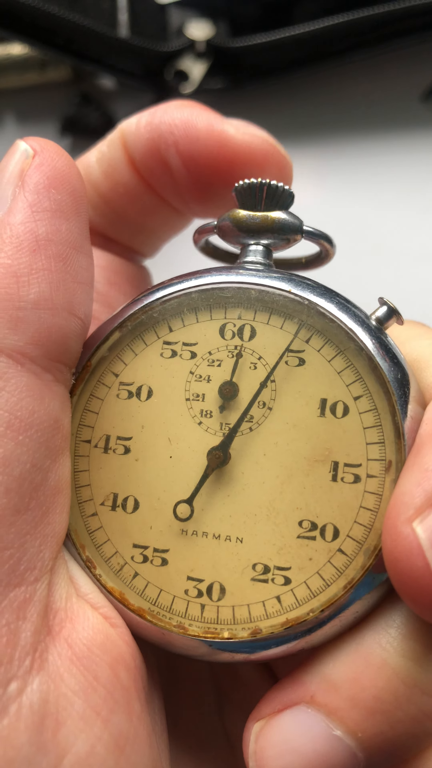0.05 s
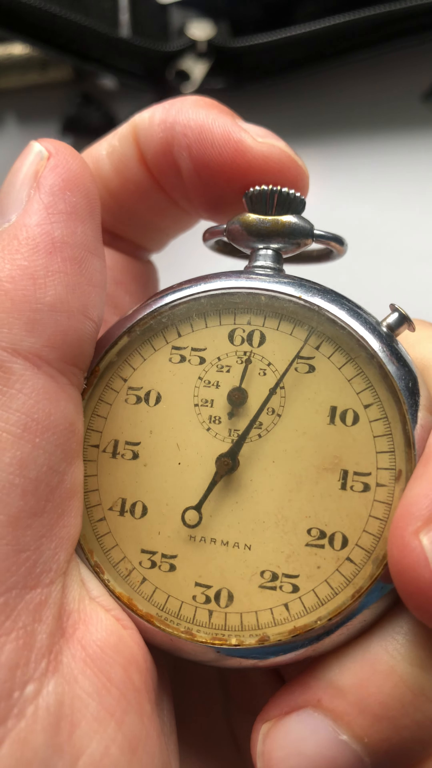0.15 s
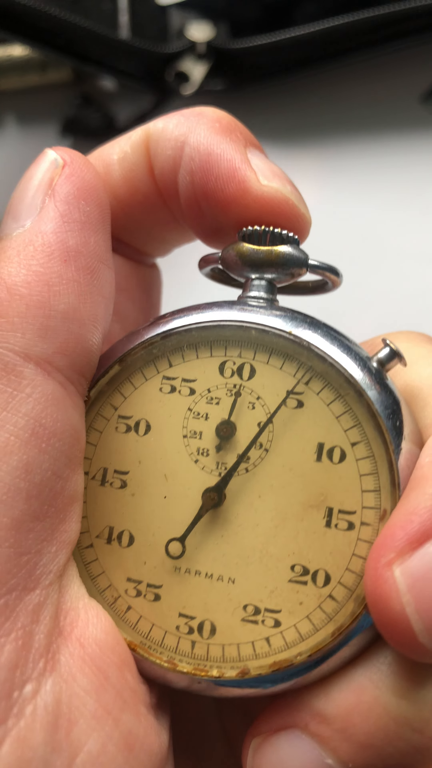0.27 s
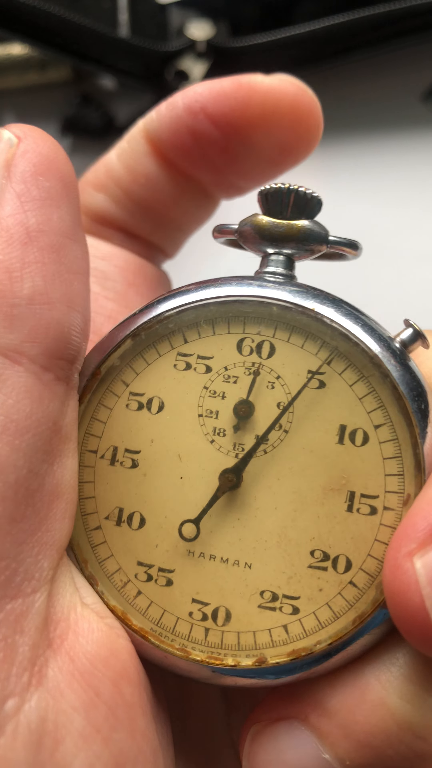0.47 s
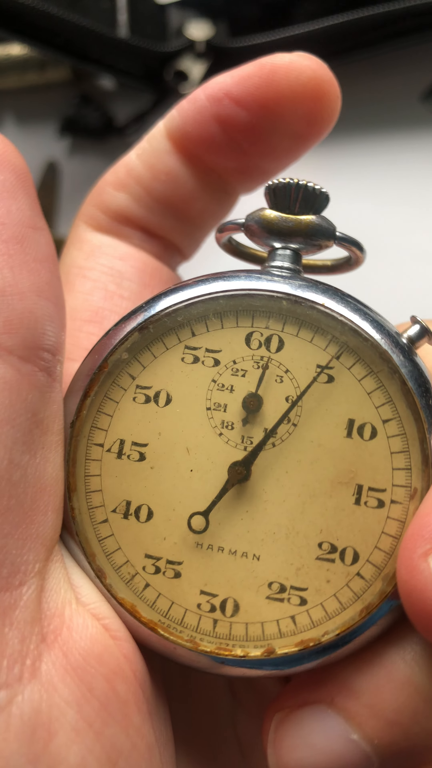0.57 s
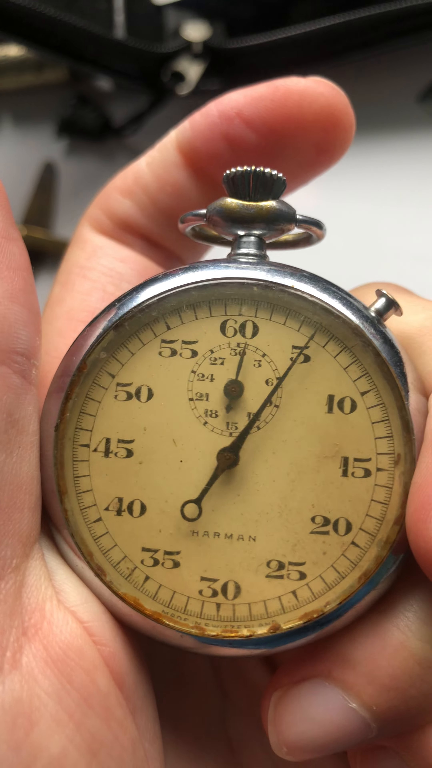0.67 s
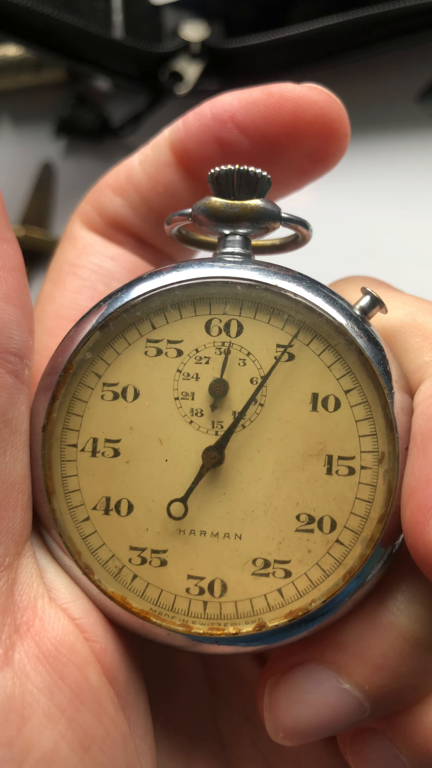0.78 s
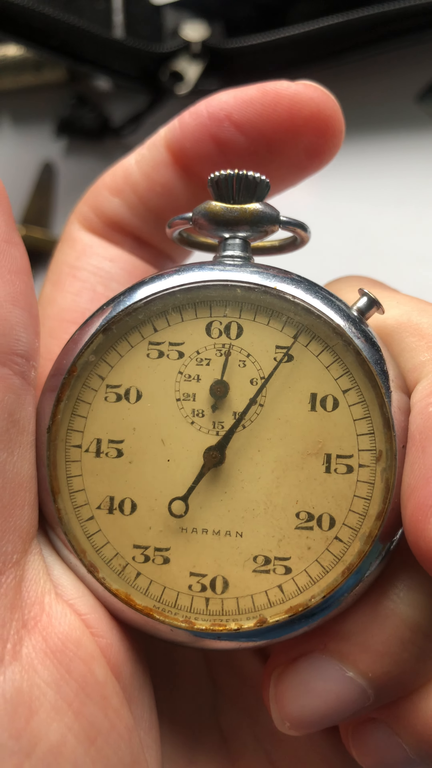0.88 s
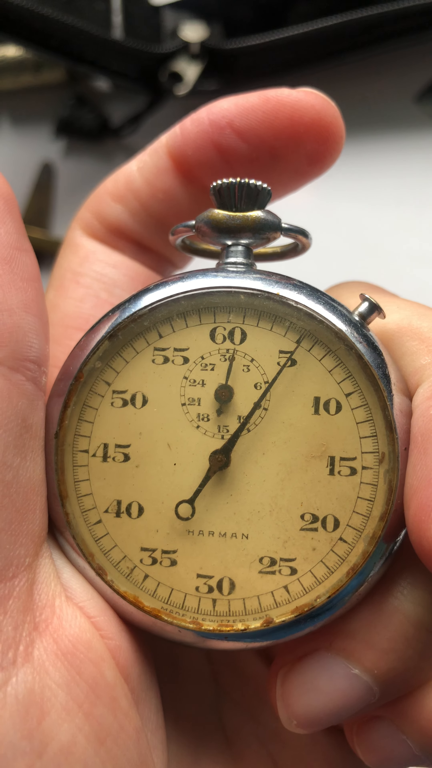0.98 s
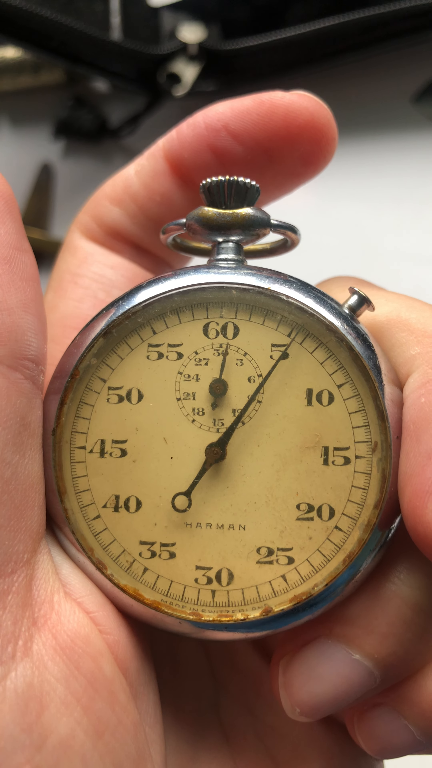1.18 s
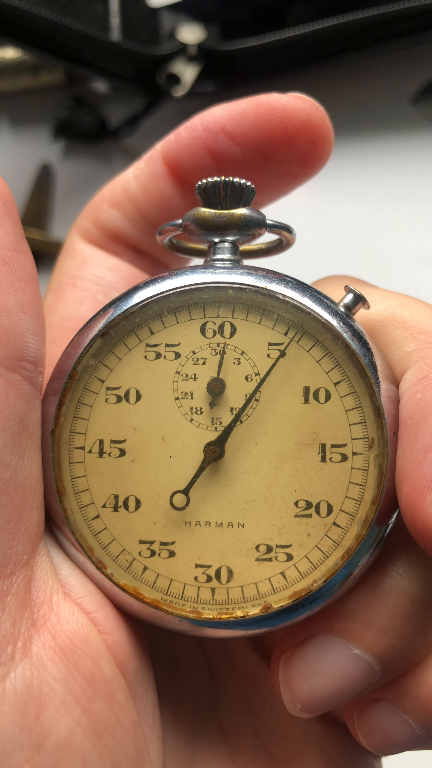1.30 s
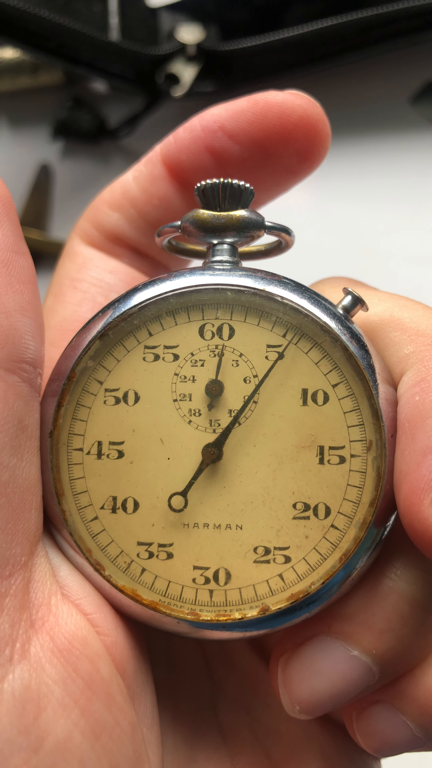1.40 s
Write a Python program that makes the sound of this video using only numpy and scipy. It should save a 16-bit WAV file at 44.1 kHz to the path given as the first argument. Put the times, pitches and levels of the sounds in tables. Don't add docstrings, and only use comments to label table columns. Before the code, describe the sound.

Close-up mechanical stopwatch in a quiet room: faint crown knocks, a firm press click and loud bright snap, a lighter spring-back click, then soft ticking about five times a second, over faint room air.

```python
import sys
import numpy as np
from scipy import signal
from scipy.fft import rfft, irfft
from scipy.io import wavfile
from scipy.ndimage import uniform_filter1d

SR = 44100
rng = np.random.default_rng(int(sys.argv[2]) if len(sys.argv) > 2 else 0)


def to_wav(sig):
    pcm = np.clip(np.atleast_2d(sig), -1, 1) * 32767
    pcm = np.round(pcm).astype(np.int16)
    wavfile.write(sys.argv[1], SR, pcm.T)


def volts_from_decibels(level):
    exponent = np.asarray(level, float) / 20
    return 10 ** exponent


N = 63945

# (frequency [Hz], level [dB per Hz])
AIR_COLOUR = [(15, -36), (25, -5), (200, -2), (1290, -17), (1610, -17.5), (2000, -19), (2690, -21.5),
              (3720, -22), (16000, -31.5)]
# (frequency [Hz], width [Hz], level [dB])
MACHINERY = [(194, 13, -76), (133, 20, -86.5)]
# (frequency [Hz], level [dB])
WALL_COLOUR = [(500, -20.5), (1200, -2.5), (2200, 2.5), (6000, -3), (16000, -11.5)]
# (time [s], frequency [Hz], level [dB], t60 [s], damped after [s])
SINGING_SPRINGS = [
    (0.265, 1069, -68.5, .9, 0.38),
    (.266, 1905, -45.5, .2, 0.12),
    (0.267, 3790, -61.5, .2, 0.12),
    (.266, 5500, -60, .15, 0.047),
    (.531, 5550, -64.5, .4, 0.078),
]
# (frequency [Hz], level [dB])
SMALL_PARTS_COLOUR = [(700, -31.5), (1400, -16.5), (2500, 0), (6000, -2), (11000, -1), (16000, 2)]
# (time [s], level [dB], chatter [s], brightness [dB per octave])
FINGER_TOUCHES = [(.0119, -53, 0.0019, -5.5), (.0172, -45.5, 0.0028, -2.5), (.0215, -48, 0.0032, 2),
                  (.0275, -66, 0.0027, 0), (.0345, -64.5, 0.0067, -11), (.108, -66.5, .03, -2),
                  (.15, -66, 0.032, 4), (.209, -62.5, 0.0053, 1.5), (.4557, -59, 0.00072, -7),
                  (.4838, -45.5, 0.0018, 3), (.5152, -40, .0018, -1)]
# (time [s], level [dB], chatter [s], brightness [dB per octave])
CROWN_PRESS = [
    (.2275, -49, .0012, 4),
    (.2392, -29, 0.0013, 2.5),
    (.2445, -40.5, 0.00078, -2),
]
# (time [s], level [dB], chatter [s], brightness [dB per octave])
LEVER_SNAP = [
    (.2637, -31.5, 0.00043, 4),
    (.2656, -12.5, 0.00093, 1.5),
    (.2685, -25, .0005, -1),
    (.2935, -56, .002, -1.5),
    (.3222, -62.5, 0.0018, 9),
]
# (time [s], level [dB], chatter [s], brightness [dB per octave])
CROWN_RELEASE = [
    (.478, -60, .006, 1),
    (.493, -50, 0.00063, 1),
    (.495, -27.5, 0.001, 3.5),
    (.5025, -48, .002, -2),
]
# (time [s], level [dB], chatter [s], brightness [dB per octave])
ESCAPEMENT_TICKS = [(.7025, -70, .002, 1), (.7138, -63.5, 0.0029, 1.4), (.7322, -55.5, 0.0035, -0.57),
                    (.8944, -67, 0.0025, 2.8), (.9085, -62.5, 0.0037, 1.2), (.9245, -58, .003, 0.32),
                    (1.103, -74.5, 0.0033, 2), (1.1165, -60, 0.0031, 0), (1.1333, -56, 0.0025, -0.44),
                    (1.2915, -67.5, 0.0015, 3), (1.3119, -64, .003, 0.77), (1.3274, -57.5, 0.0017, 1.25)]
# (frequency [Hz], level [dB], t60 [s])
TOUCH_CASE_MODES = [(1790, -10, .015), (2030, 1, .025), (2340, -4, .025), (2910, -4.5, 0.017),
                    (3100, -8, 0.03), (3770, -8.5, .02), (4700, -13, .015), (5500, -10.5, 0.036),
                    (8600, -28.5, 0.025)]
PRESS_CASE_MODES = [(1240, -20.5, .014), (1900, -3, .015), (2380, -5.5, .022), (2937, 1.5, .02),
                    (3710, -15.5, 0.026), (4678, -9, .025), (5340, 2.5, .018), (5550, -1.5, .028),
                    (7337, -10.5, .01), (8400, -9, .01), (11000, -13.5, .01), (11770, -8.5, .008),
                    (13400, -16.5, .008), (15500, -9.5, .01)]
SNAP_CASE_MODES = [(850, -38.5, .012), (1460, -19, 0.0082), (1905, 1, 0.014), (2282, -5.5, 0.016),
                   (2980, -13.5, .02), (3790, -19, .035), (5050, -5, .012), (5500, -6.5, 0.015),
                   (8730, -2, 0.0058), (10100, -9, 0.0063), (11450, -10, 0.0057), (13330, -16, 0.016),
                   (14450, -10, 0.0053), (15460, -17.5, 0.0077)]
RELEASE_CASE_MODES = [(1226.5, -13, 0.048), (1757, 3, 0.012), (2030, -16.5, 0.075), (2430, -2.5, 0.038),
                      (2890, 4, 0.017), (3780, -9, 0.025), (4550, 6, 0.004), (5630, -15, 0.02),
                      (5840, -15.5, 0.031), (7770, -12.5, 0.024), (8500, -22, .008), (11870, -4, .006),
                      (12450, -35.5, .01), (15240, -22, .008)]
TICK_CASE_MODES = [(2355, -6, 0.013), (2790, -9.5, 0.062), (3023, -0.5, 0.016), (4724, -10.5, .07),
                   (5250, -1.5, 0.025), (5550, -2, 0.032), (6430, -4, 0.0083), (7245, -7.5, 0.013),
                   (8920, 1.5, 0.0057), (9890, -7.5, 0.018), (10430, -8, .035), (12700, -1, 0.0069),
                   (13300, -5, 0.005), (14500, -2, 0.012)]

AIR_DB, AIR_PATCHY_DB = -71, 3
WALLS_DB, WALLS_T60_S = -34.5, 0.34
NEAR_DB, NEAR_T60_S = -21.5, 0.027
MODAL_ECHO_DB = -5.5
GATE_S, GATE_FALL_S = 0.06, 0.05
CHATTER_PER_S, CHATTER_SPREAD_DB = 9000, 4.0
MODE_SPREAD_DB = 2.0
SMALL_PARTS_T60_S = 0.014
BODY_LOW_HZ = 700


def rms_one(x):
    return x / np.sqrt(np.mean(x ** 2) + 1e-20)


def colour(x, points):
    hz, db = np.transpose(points)
    f = np.maximum(np.arange(len(x) // 2 + 1) * SR / len(x), 1)
    gain = volts_from_decibels(np.interp(np.log(f), np.log(hz), db))
    return irfft(rfft(x) * gain, len(x))


def ring(clicks, hz, t60):
    radius = volts_from_decibels(-60 / (t60 * SR))
    angle = 2 * np.pi * hz / SR
    return signal.lfilter([0, np.sin(angle)], [1, -2 * radius * np.cos(angle), radius * radius], clicks + 1e-18)


def machinery():
    hum = np.zeros(N)
    for hz, width, db in MACHINERY:
        hum += volts_from_decibels(db) * rms_one(ring(rng.standard_normal(N), hz, 0.96 / width))
    return hum


def room_air():
    drift = rms_one(uniform_filter1d(rng.standard_normal(N), size=SR // 20))
    air = rms_one(colour(rng.standard_normal(N), AIR_COLOUR))
    low = signal.sosfilt(signal.butter(2, 600, fs=SR, output="sos"), air)
    return volts_from_decibels(AIR_DB) * (air + low * (volts_from_decibels(AIR_PATCHY_DB * drift) - 1))


def room_answer(x):
    t = np.arange(SR // 3) / SR
    gate = 1 / (1 + np.exp(np.clip((t - GATE_S) / GATE_FALL_S * 4, -50, 50)))
    walls = volts_from_decibels(WALLS_DB - 60 * t / WALLS_T60_S) * gate
    near = volts_from_decibels(NEAR_DB - 60 * t / NEAR_T60_S)
    decay = (walls + near) * (t > 0.002) / 10
    envelope = np.sqrt(np.abs(signal.fftconvolve(x ** 2, decay ** 2)[:N]))
    diffuse = envelope * rms_one(colour(rng.standard_normal(N), WALL_COLOUR))
    modal = signal.fftconvolve(x, decay * rng.standard_normal(len(t)))[:N]
    return diffuse + volts_from_decibels(MODAL_ECHO_DB) * modal


def singing_springs():
    t = np.arange(N) / SR
    tones = np.zeros(N)
    for s, hz, db, t60, length in SINGING_SPRINGS:
        decay = volts_from_decibels(db - 60 * np.maximum(t - s, 0) / t60) * (t > s)
        damping = np.clip((s + length - t) / 0.023 + 1, 0, 1)
        tones += decay * damping * np.sin(2 * np.pi * hz * (t - s))
    return tones


def tilt(hz, db_per_octave):
    return db_per_octave * np.log2(max(hz, 2000) / 3000)


def click_chatter(t, length):
    sizes = volts_from_decibels(CHATTER_SPREAD_DB * rng.standard_normal(len(t))) * rng.choice([-1, 1], len(t))
    born = rng.random(len(t)) < CHATTER_PER_S / SR
    chatter = sizes * born * np.sqrt(t / length) * np.exp(-(t / length) ** 2)
    return chatter / np.sqrt(np.sum(chatter ** 2) + 1e-20)


def small_parts(chatter, t, tilt_db, fine_db):
    tilted = [(hz, db + tilt(hz, tilt_db)) for hz, db in SMALL_PARTS_COLOUR]
    burst = colour(rng.standard_normal(len(t)), tilted) * volts_from_decibels(fine_db - 60 * t / SMALL_PARTS_T60_S)
    return signal.fftconvolve(chatter, burst)[:len(t)]


def case_ring(chatter, modes, tilt_db):
    sound = np.zeros(len(chatter))
    spread = MODE_SPREAD_DB * rng.standard_normal(len(modes))
    for k, ((hz, db, t60), own_db) in enumerate(zip(modes, spread)):
        mode = ring(chatter, hz, t60)
        even = np.sqrt(SR * t60 / 27.6 / np.sum(mode ** 2))
        sound += (-1) ** k * even * volts_from_decibels(db + own_db + tilt(hz, tilt_db)) * mode
    return sound


def contacts(rows, modes, fine_db):
    out = np.zeros(N + SR)
    t = np.arange(SR // 4) / SR
    for s, db, length, tilt_db in rows:
        chatter = click_chatter(t, length)
        sound = small_parts(chatter, t, tilt_db, fine_db) + case_ring(chatter, modes, tilt_db)
        start = int(s * SR)
        out[start:start + len(t)] += volts_from_decibels(db) * sound
    return out[:N]


def finger_touches():
    return contacts(FINGER_TOUCHES, TOUCH_CASE_MODES, fine_db=-19.5)


def crown_press():
    return contacts(CROWN_PRESS, PRESS_CASE_MODES, fine_db=-4.5)


def lever_snap():
    return contacts(LEVER_SNAP, SNAP_CASE_MODES, fine_db=-10.5)


def crown_release():
    return contacts(CROWN_RELEASE, RELEASE_CASE_MODES, fine_db=-5.5)


def escapement():
    return contacts(ESCAPEMENT_TICKS, TICK_CASE_MODES, fine_db=-3.0)


def stopwatch():
    clicks = finger_touches() + crown_press() + lever_snap() + crown_release() + escapement()
    return signal.sosfilt(signal.butter(3, BODY_LOW_HZ, "high", fs=SR, output="sos"), clicks)


def scene():
    watch = stopwatch()
    background = room_air() + machinery()
    return (watch + singing_springs() + room_answer(watch) + background)[None]


def low_pass(x):
    return signal.sosfilt(signal.butter(12, 16680, fs=SR, output="sos"), x)


def record(dry):
    mix = signal.sosfilt(signal.cheby2(16, 70, 16350, fs=SR, output="sos"), dry)
    mix = signal.sosfilt(signal.butter(2, 45, "high", fs=SR, output="sos"), mix)
    return low_pass(mix)


dry = scene()
out = record(dry)
to_wav(out)
```